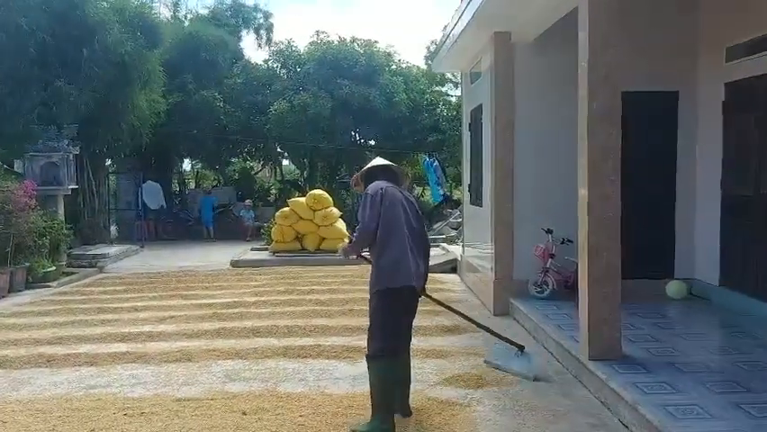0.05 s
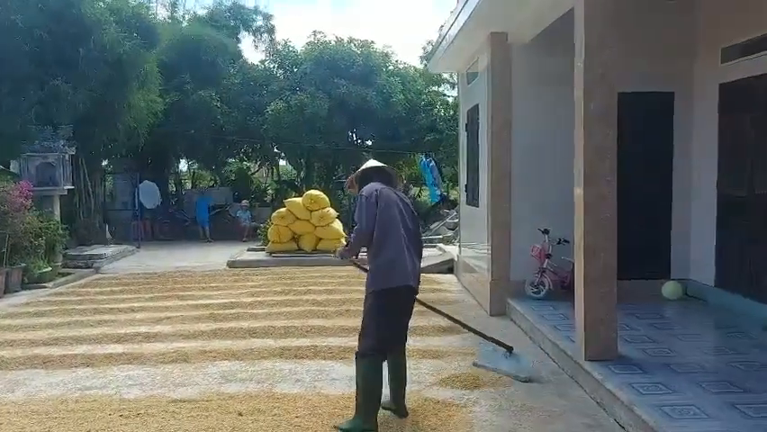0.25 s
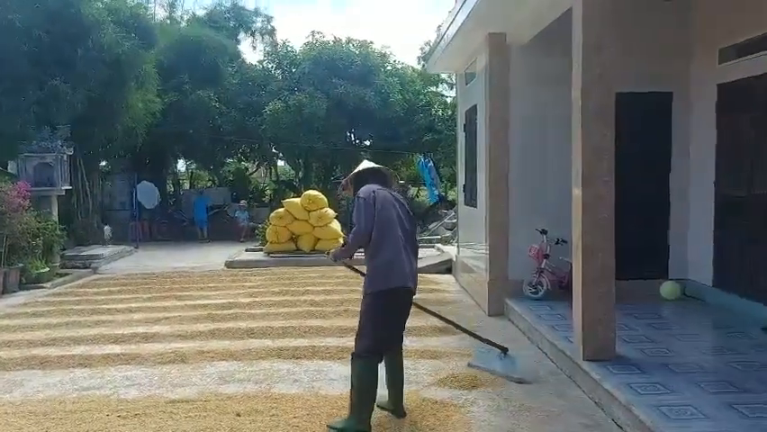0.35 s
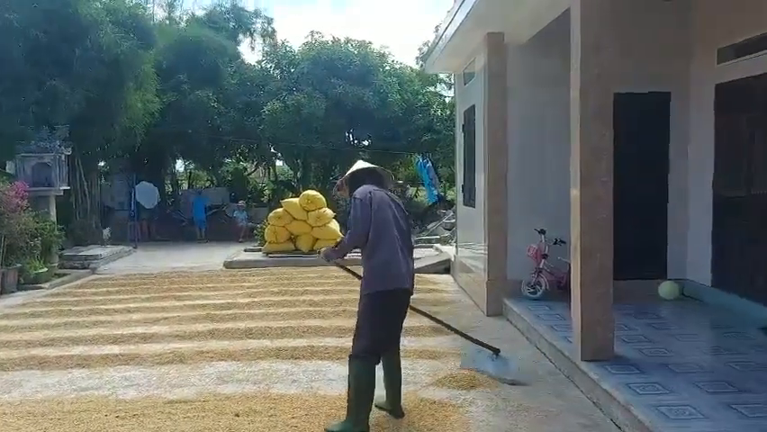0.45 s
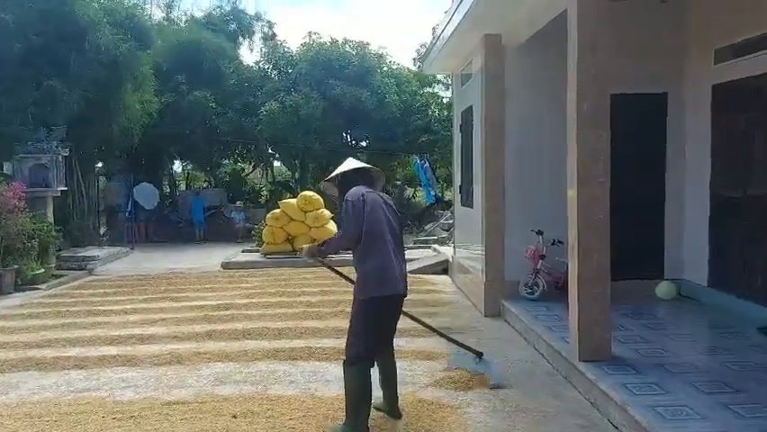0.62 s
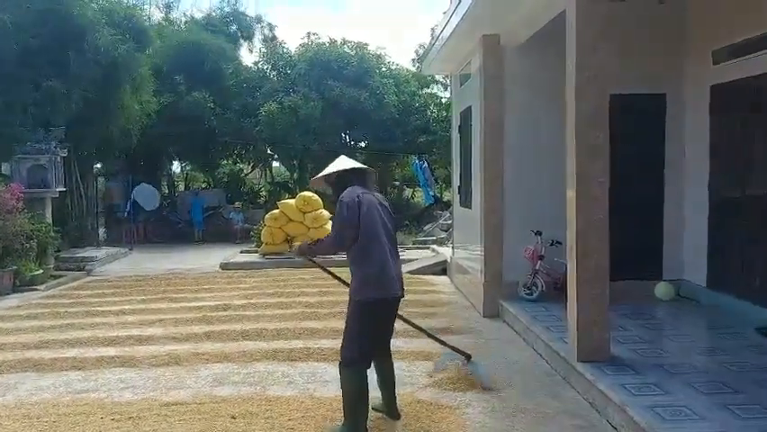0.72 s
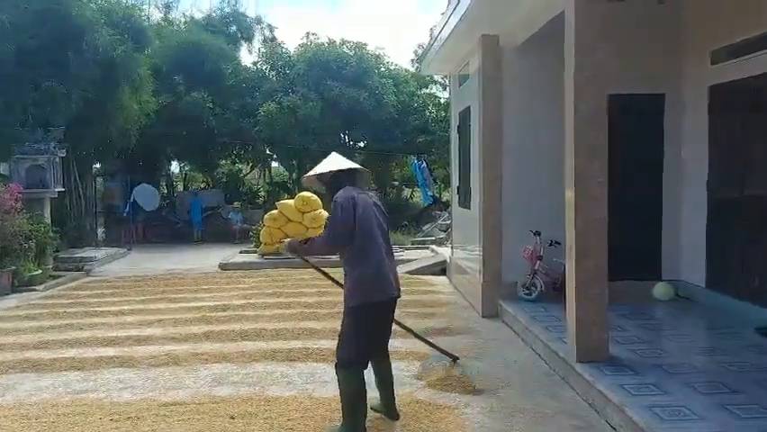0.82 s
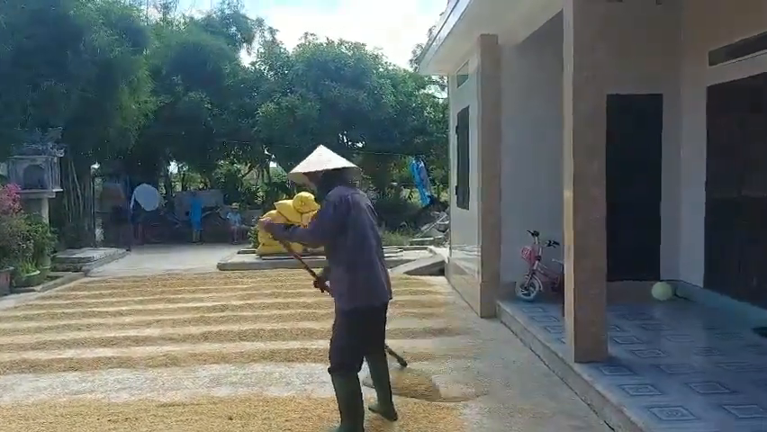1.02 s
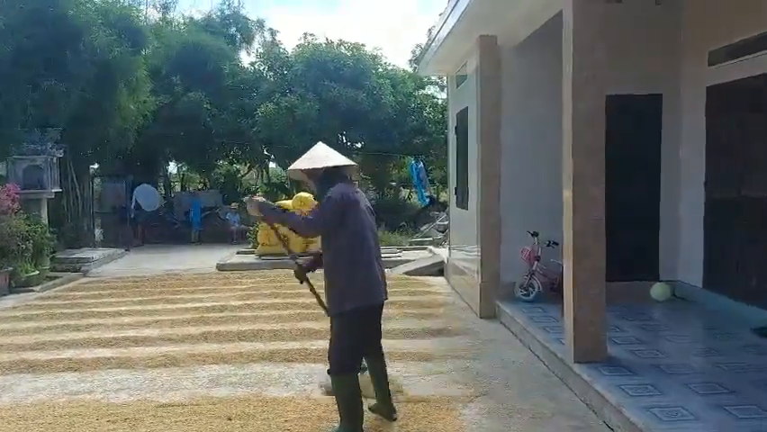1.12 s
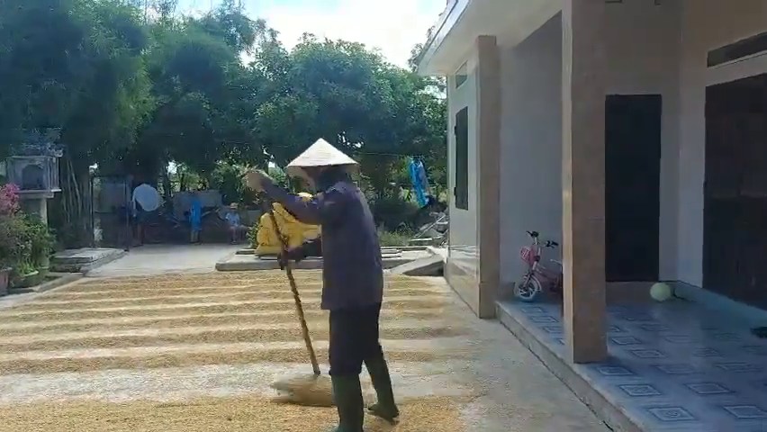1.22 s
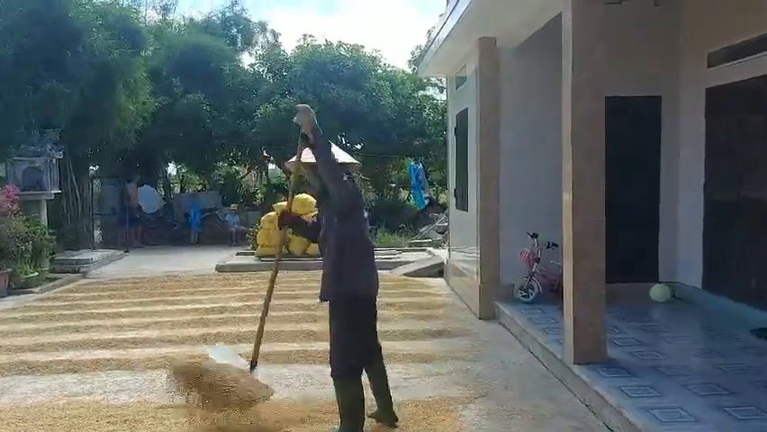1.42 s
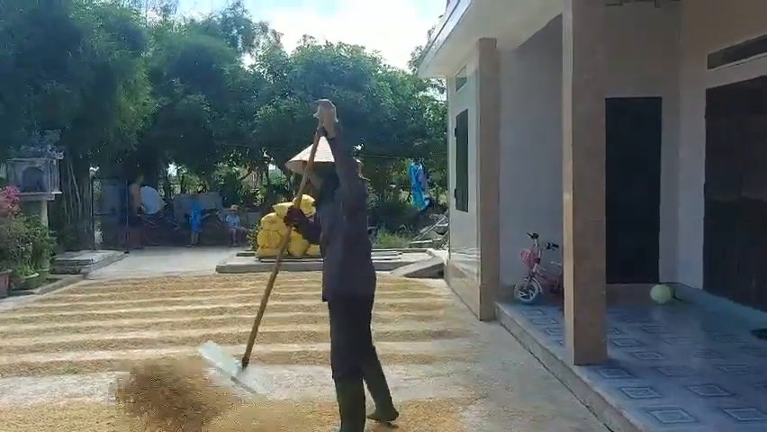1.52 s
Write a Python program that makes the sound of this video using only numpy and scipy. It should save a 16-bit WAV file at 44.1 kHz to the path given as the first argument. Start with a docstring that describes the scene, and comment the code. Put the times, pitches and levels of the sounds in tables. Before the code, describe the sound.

A wide grain rake drops onto a paved yard at about 0.2 seconds with a short, ringing clatter. From 0.4 to 1.1 seconds it drags through dry rice, rumbling and rasping unevenly under the hiss of husks, strongest near 0.7. It then lifts, and flung grain hisses softly and brightly until 1.5 seconds. Faint thin whistles, a bird or blade squeaks, come mostly between 0.8 and 1.3 seconds.

```python
"""A short ringing clatter, then rumble, rasp and hiss: a wide, long-handled grain rake is dropped on a
paved yard beside a porch and pulled through drying rice. The blade judders and rings as it lands,
then catches and slips on the paving while husks rub ahead of it; at the end it lifts and flings the
grain aside. Grain from the previous stroke hisses briefly at the start. Thin whistles, a bird or
squeaks of the edge, sound over a quiet outdoor background."""
import sys
import numpy as np
from scipy import signal
from scipy.fft import rfft, irfft
from scipy.io import wavfile

SR = 44100
rng = np.random.default_rng(int(sys.argv[2]) if len(sys.argv) > 2 else 0)


def int16_out(signal):
    """Quantize to a 16-bit WAV file."""
    q = np.round(np.clip(np.atleast_2d(signal).T, -1, 1) * 32767)
    wavfile.write(sys.argv[1], SR, q.astype(np.int16))


N = 68355
T = np.arange(N) / SR
HZ = np.maximum(np.arange(N + 1) * SR / (2 * N), 1)
LAND_S, LAND_RISE_S, LAND_SWELL_DB = 0.1984, 0.0093, 1.5
CATCHES_PER_S, GRAINS_PER_S = 900, 14000

# bearing of the blade on the paving: t/s, rumble/dB, rasp/dB
BEARING = [(.3, -109, -101), (.42, -48.5, -67), (.46, -50, -41), (.49, -68, -53.5), (.535, -42.5, -41),
           (.6, -43, -38), (.655, -33, -34), (.76, -37, -39.5), (.83, -47, -46.5), (.9, -41.5, -46.5),
           (.98, -49, -43), (1.04, -44.5, -44.5), (1.075, -46.5, -37.5), (1.115, -62, -48.5),
           (1.2, -77, -62), (1.3, -88, -74)]
# microphone pair: f/Hz, likeness/0-1, left-right/dB
MIC_PAIR = [(25, 1, 4), (70, 0.92, -0.5), (153, 1, -0.5), (352, 0.89, 1.1), (716, 1, 2), (1030, 0.4, 3.5),
            (1370, 0.44, 4), (2180, 0, 7.5), (3200, 0.9, -0.5), (4040, 0, -0.5), (4970, .02, -1.5),
            (5650, 0, -11.5), (6650, 0.06, -2), (11800, 0.06, 2.5), (14500, .02, -5.5)]


def landing():
    """The blade's edge chatters on the paving, over a dull thud."""
    # spectra: f/Hz, relative level/dB
    clatter_spectrum = [(100, -36), (250, -2.5), (420, -4.5), (510, -13), (700, 3.5), (1050, -11.5),
                        (1380, -0.5), (1650, -4.5), (2200, -0.5), (3000, -10.5), (4300, -7), (6200, -10.5),
                        (7200, -16), (11000, -19.5), (16000, -25)]
    thud_spectrum = [(40, -38), (80, -11), (125, 1), (200, 3), (310, -1), (450, -5), (900, -29)]
    clatter = at_mics(impacts(per_s=1800), clatter_spectrum)
    clatter *= blow(LAND_SWELL_DB, LAND_RISE_S, hold_s=0.057, fall_db_per_s=175)
    thud = at_mics(impacts(CATCHES_PER_S), thud_spectrum)
    thud *= blow(swell_db=20, rise_s=0.016, hold_s=0.09, fall_db_per_s=64)
    return from_db(-26.25) * (clatter + porch(clatter)) + from_db(-39.5) * thud


def blade_ring():
    """Modes store the landing's energy and decay; the pull keeps them faintly alive."""
    # blade modes: f/Hz, relative level/dB, t60/s, left-right/dB
    modes = [(153, -4, .7, 0), (295, -7, .4, 0), (417, -6, .3, 0), (585, -4, .5, -2), (726, -2, .62, 0),
             (858, -4, .35, 3), (991, -7, .3, 4), (1326, 2.5, .25, 0), (1430, -4, .25, 3),
             (1742, -6, .3, 4), (2128, 3, .42, 2), (2325, -7, .5, 6), (2445, -5, .45, 5),
             (2524, -6, .45, 8), (2600, -8, .35, 4), (3168, -7, .55, 6), (3835, -9, .3, 0),
             (4061, -10, .3, 6), (4539, -5, .5, 0), (5115, -8, .3, -7), (5755, -9, .3, -7),
             (6138, -10, .3, -7)]
    _, rasp = gain_curves(BEARING)
    drag = from_db(-22.25) * rasp / rasp.max() * (T > BEARING[0][0])
    drive = blow(LAND_SWELL_DB, LAND_RISE_S, hold_s=0.068, fall_db_per_s=211) + drag
    ring = np.zeros((2, N))
    for hz, db, t60_s, side_db in modes:
        retained = np.exp(-np.log(1e6) / (t60_s * SR))
        energy = signal.lfilter([1], [1, -retained], drive ** 2)
        envelope = from_db(db - 36.5) * np.sqrt(energy / energy.max())
        ring += envelope * pan(side_db) * tone_pair(hz, width_hz=14, rough=.6)
    return ring


def pull():
    """The edge catches and slips on the rough paving."""
    # spectra: f/Hz, relative level/dB
    rumble_spectrum = [(40, -33), (80, -27), (120, -2.5), (153, 8), (180, -9), (210, -6), (300, -6),
                       (450, -28.5), (900, -39)]
    rasp_spectrum = [(120, -62), (280, 4.5), (400, -0.5), (500, -1), (690, -1), (870, -8), (1100, -15.5),
                     (1370, -5.5), (1700, -15), (2300, -10), (3200, -24.5), (8000, -41)]
    rumble_gain, rasp_gain = gain_curves(BEARING)
    rumble = rumble_gain * at_mics(impacts(CATCHES_PER_S), rumble_spectrum)
    rasp = rasp_gain * at_mics(impacts(CATCHES_PER_S), rasp_spectrum)
    return rumble + rasp


def grain():
    """Dry husks rub ahead of the blade, then scatter with a brighter hiss."""
    # hiss of sliding and of flung grain: t/s, level/dB
    slide_levels = [(.2, -38.5), (.265, -32.5), (.34, -44), (.44, -41.5), (.46, -36), (.51, -38), (.6, -32),
                    (.72, -34.5), (.87, -38), (1.02, -40), (1.08, -38.5), (1.17, -47.5), (1.26, -51),
                    (1.3, -45), (1.38, -56), (1.55, -45.5)]
    spray_levels = [(.8, -76), (1.1, -45.5), (1.3, -46.5), (1.4, -48.5), (1.5, -44), (1.55, -50.5)]
    # spectra: f/Hz, relative level/dB
    slide_spectrum = [(150, -25), (700, -6.5), (1050, -12.5), (1400, -8), (2300, -2.5), (3100, -8),
                      (4200, -4), (5500, -7), (6800, -5), (7800, -3.5), (9500, -6), (12000, 2.5),
                      (14200, -3.5), (16000, -18)]
    spray_spectrum = [(150, -35), (300, -21), (1000, -27), (2300, -4.5), (3100, -11), (4500, -9),
                      (7000, -4), (10000, -4), (12500, 5.5), (16000, -2.5)]
    slide = at_mics(impacts(GRAINS_PER_S, spread_db=3), slide_spectrum) * (T > LAND_S)
    spray = at_mics(impacts(GRAINS_PER_S, spread_db=3), spray_spectrum)
    return gain_curves(slide_levels)[0] * slide + gain_curves(spray_levels)[0] * spray


def whistles():
    """Thin, rough tones, most falling slightly: a bird or squeaks of the edge."""
    # whistles: start/s, length/s, start f/Hz, end f/Hz, level/dB, left-right/dB
    glides = [(.105, .05, 3950, 3930, -62, 0), (.46, .08, 6200, 6230, -46, -6),
              (.8, .16, 4060, 3930, -50, -2), (.97, .11, 3870, 3860, -51, -2),
              (1.105, .13, 5090, 4850, -53, -4), (1.21, .095, 4870, 4730, -49.5, -4)]
    sound = np.zeros((2, N))
    for start_s, length_s, from_hz, to_hz, db, side_db in glides:
        hz = np.interp(T, [start_s, start_s + length_s], [from_hz, to_hz])
        envelope = from_db(db) * arch(start_s, length_s)
        sound += envelope * pan(side_db) * tone_pair(hz, width_hz=70, rough=.55)
    return sound


def early_echoes(x):
    """Paving, pillars and wall comb the sound of the rake."""
    # reflections: left delay/s, right delay/s, level/dB
    echoes = [(.0031, .0033, -16), (.0074, .0078, -9), (.0123, .0119, -11), (0.0184, .0192, -8.5)]
    bright = signal.sosfilt(signal.butter(2, 590, "high", fs=SR, output="sos"), x)
    reflected = np.zeros((2, N))
    for left_s, right_s, db in echoes:
        for side, delay_s in enumerate((left_s, right_s)):
            lag = int(delay_s * SR)
            reflected[side, lag:] += from_db(db) * bright[side, :N - lag]
    return reflected


def porch(x, delay_s=0.021, t60_s=1, crossover_hz=900):
    """Diffuse reflections from porch and house wall; both sides share the bass."""
    age_s = T - delay_s
    tails = rng.standard_normal((3, N)) * (age_s > 0) * from_db(-60 * age_s / t60_s)
    tails = rms_one(tails) / np.sqrt(N)
    bass = signal.sosfilt(signal.butter(2, crossover_hz, fs=SR, output="sos"), tails[0])
    treble = signal.sosfilt(signal.butter(2, crossover_hz, "high", fs=SR, output="sos"), tails[1:])
    return from_db(-7) * signal.fftconvolve(x, bass + treble, axes=1)[:, :N]


def boot_step():
    """One soft, low footfall."""
    return from_db(-56) * arch(start_s=0.1, length_s=0.066) * tone(hz=136.5, width_hz=33, rough=0.6)


def yard():
    """Brief fading hiss of grain from the previous stroke, then quiet air; a low rumble dies down."""
    # envelopes: t/s, level/dB
    rumble_levels = [(0, -57), (.5, -50), (1.05, -50), (1.25, -64), (1.45, -72), (1.55, -63)]
    grain_tail_and_air_levels = [(0, -48.5), (.025, -48.5), (.055, -55.5), (.19, -57), (1.55, -56)]
    # spectra: f/Hz, relative level/dB
    rumble_spectrum = [(20, -40), (45, -13.5), (85, 2.5), (130, -2), (250, -5.5), (700, -21.5), (2000, -54)]
    hiss_spectrum = [(20, -7), (100, -5), (300, 0.5), (700, -1.5), (1100, -7), (2200, 1.5), (3100, -5.5),
                     (4200, -2), (7000, -12), (12000, -12.5), (16000, -16)]
    rumble = at_mics(rng.standard_normal((2, N)), rumble_spectrum)
    hiss = at_mics(rng.standard_normal((2, N)), hiss_spectrum)
    return gain_curves(rumble_levels)[0] * rumble + gain_curves(grain_tail_and_air_levels)[0] * hiss


def impacts(per_s, spread_db=1.5):
    """Two streams of random tiny impacts, mostly small, a few large."""
    sizes = from_db(spread_db * np.minimum(rng.exponential(1, (2, N)), 5))
    signs = rng.choice([-1, 1], (2, N))
    hits = rng.random((2, N)) < per_s / SR
    return rms_one(sizes * signs * hits)


def blow(swell_db, rise_s, hold_s, fall_db_per_s):
    """Landing envelope: first touch, swell to 1, fall from hold_s after the touch."""
    age_s = T - LAND_S
    touch = np.clip(age_s / 0.005, 0, 1)
    rise_db = swell_db * (np.clip(age_s / rise_s, 0, 1) - 1)
    fall_db = fall_db_per_s * np.maximum(age_s - hold_s, 0)
    return touch * from_db(rise_db - fall_db)


def arch(start_s, length_s):
    """Rounded swell."""
    progress = np.clip((T - start_s) / length_s, 0, 1)
    return np.sqrt(np.abs(np.sin(np.pi * progress)))


def tone(hz, width_hz, rough):
    """Sine of randomly wandering strength and phase; rms 1."""
    blur = signal.butter(2, width_hz, fs=SR, output="sos")
    wander = rough * rms_one(signal.sosfilt(blur, rng.standard_normal((2, 2 * N)))[:, N:])
    phase = 2 * np.pi * (np.cumsum(hz * np.ones(N)) / SR + rng.random())
    return rms_one((1 + wander[0]) * np.sin(phase) + wander[1] * np.cos(phase))


def tone_pair(hz, width_hz, rough):
    """Wandering tone at both microphones: alike in the bass, mostly unrelated in the treble."""
    left, other = [tone(hz, width_hz, rough) for _ in range(2)]
    alike = np.clip(np.interp(np.mean(hz), HZ, over_hz(MIC_PAIR)[0]), 0, 1)
    return rms_one(np.array([left, alike * left + (1 - alike) * other]))


def at_mics(streams, spectrum, left_lag_s=.0001):
    """Colour two unrelated streams and blend them as the microphone pair hears them; rms 1."""
    alike, side_db = over_hz(MIC_PAIR)
    blend_rad = np.arcsin(np.clip(alike, 0, 1)) / 2
    coloured = rfft(streams, 2 * N) * from_db(over_hz(spectrum)[0])
    left, right = (coloured * np.cos(blend_rad) + coloured[::-1] * np.sin(blend_rad)) * pan(side_db)
    left *= np.exp(-2j * np.pi * HZ * left_lag_s)
    return rms_one(irfft(np.array([left, right]))[:, :N])


def pan(side_db):
    """Left and right gains, constant power."""
    gains = from_db(np.array([[1], [-1]]) * side_db / 2)
    return gains / np.sqrt(np.mean(gains ** 2, axis=0))


def gain_curves(rows):
    """Gains over time from rows of t/s, level/dB, ..."""
    times_s, *columns = np.transpose(rows)
    return [from_db(np.interp(T, times_s, db)) for db in columns]


def over_hz(rows):
    """Table columns interpolated over log frequency."""
    hz, *columns = np.transpose(rows)
    return [np.interp(np.log(HZ), np.log(hz), column) for column in columns]


def from_db(db):
    """Decibels to gain."""
    return 10 ** (np.asarray(db) / 20)


def rms_one(x):
    """Scale to unit rms."""
    return x / np.sqrt(np.mean(x ** 2) + 1e-20)


def scene():
    """One stroke of the rake in the yard."""
    rake = landing() + pull() + grain()
    return rake + early_echoes(rake) + blade_ring() + whistles() + boot_step() + yard()


def record(dry):
    """Steep low-pass."""
    cutoff_hz = 16200
    return signal.sosfilt(signal.ellip(12, .1, 80, cutoff_hz, fs=SR, output="sos"), dry)


dry = scene()
out = record(dry)
int16_out(out)
```